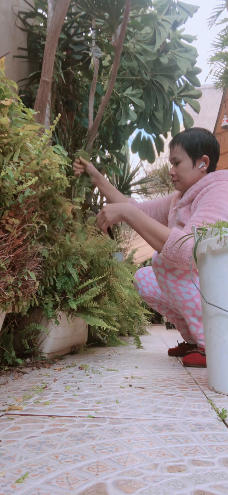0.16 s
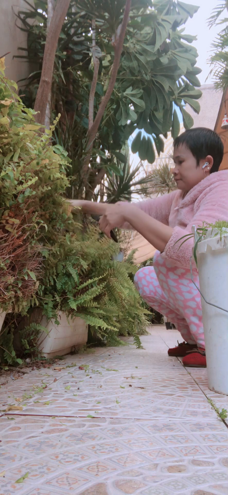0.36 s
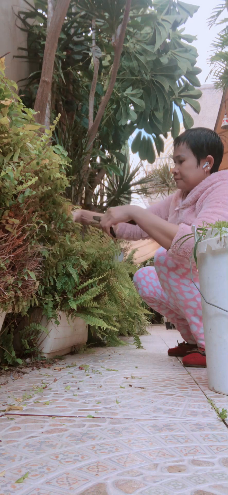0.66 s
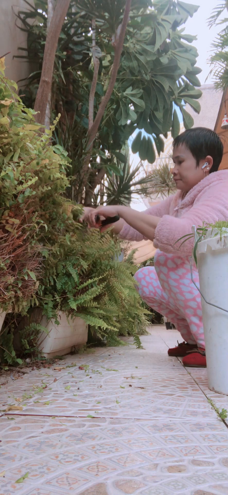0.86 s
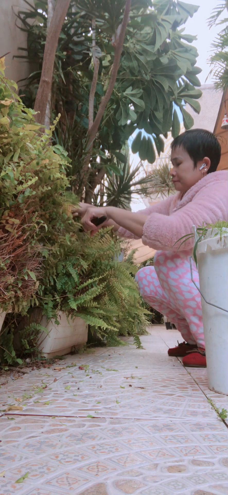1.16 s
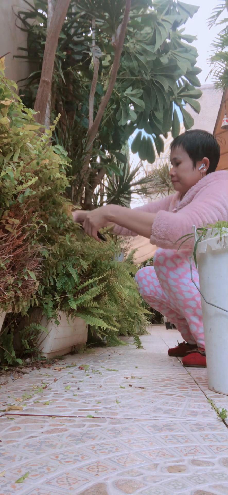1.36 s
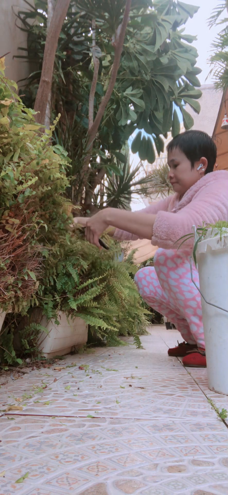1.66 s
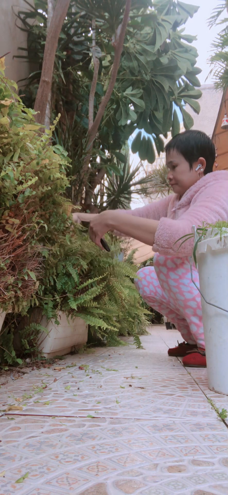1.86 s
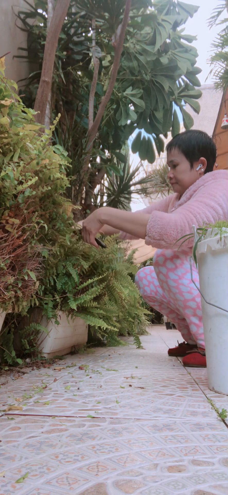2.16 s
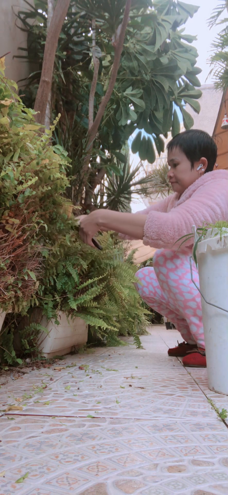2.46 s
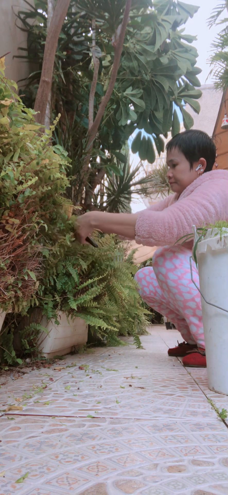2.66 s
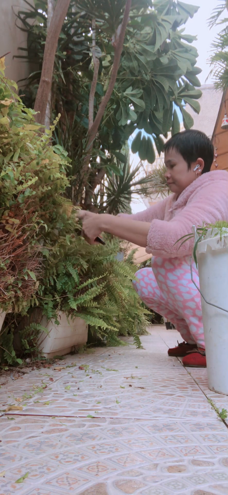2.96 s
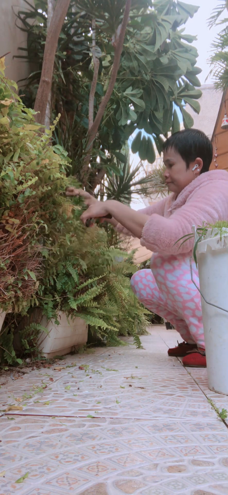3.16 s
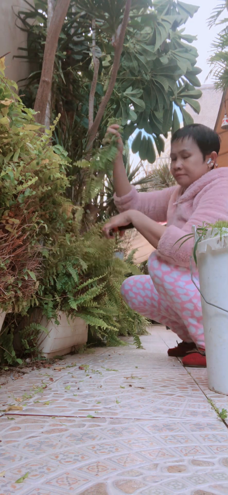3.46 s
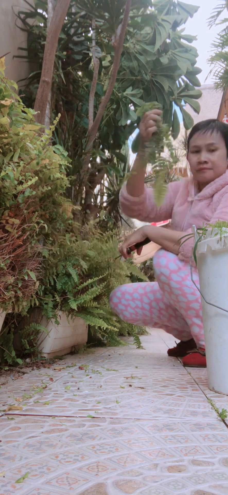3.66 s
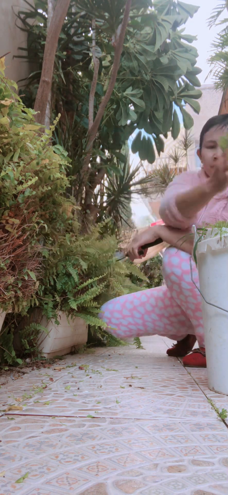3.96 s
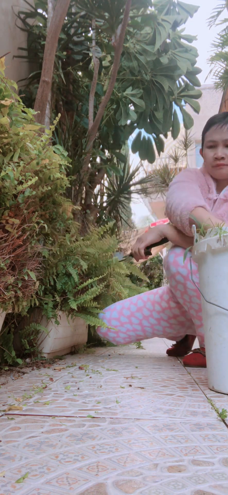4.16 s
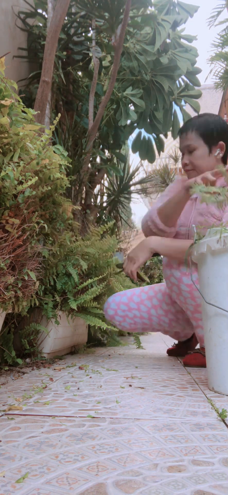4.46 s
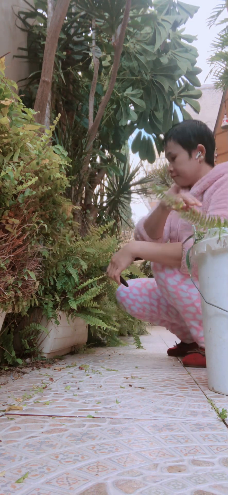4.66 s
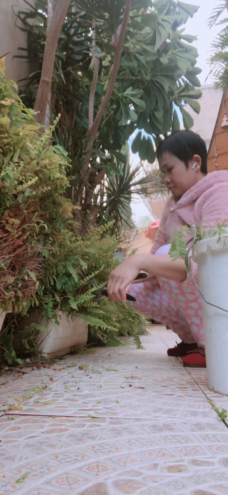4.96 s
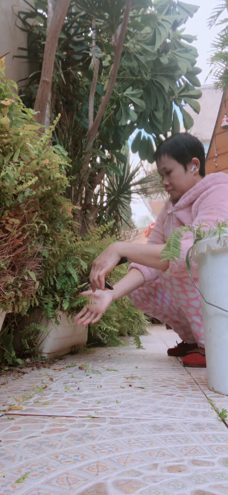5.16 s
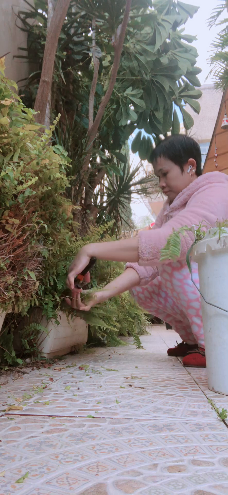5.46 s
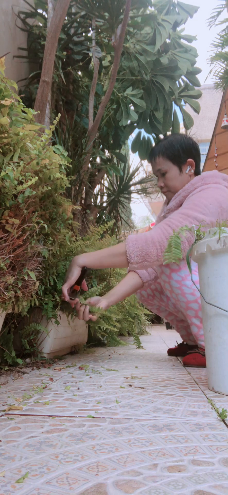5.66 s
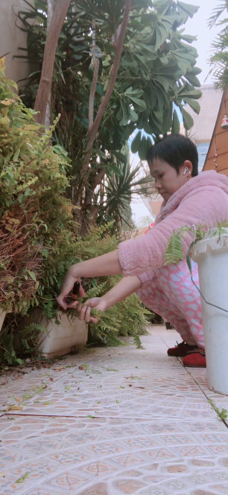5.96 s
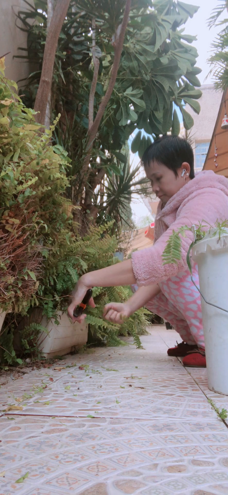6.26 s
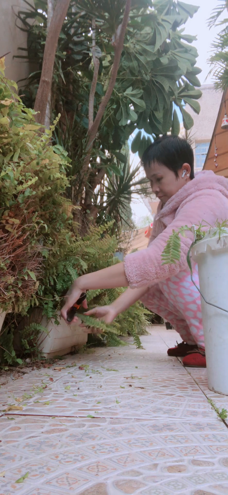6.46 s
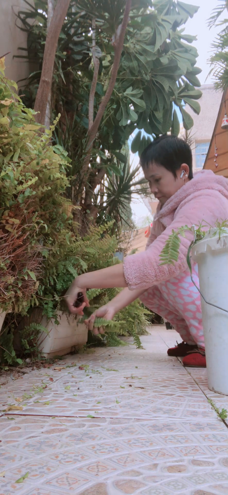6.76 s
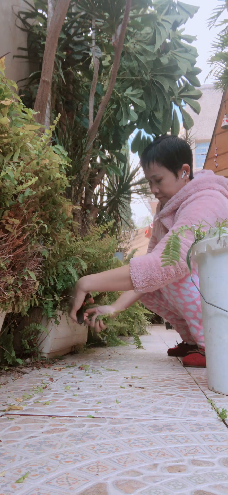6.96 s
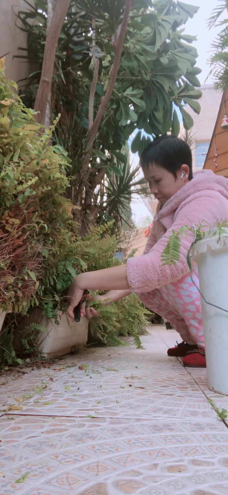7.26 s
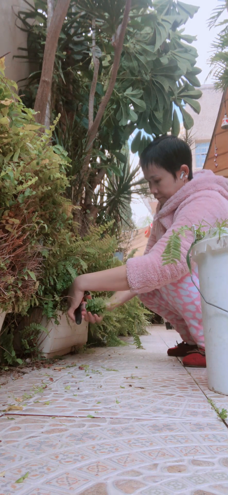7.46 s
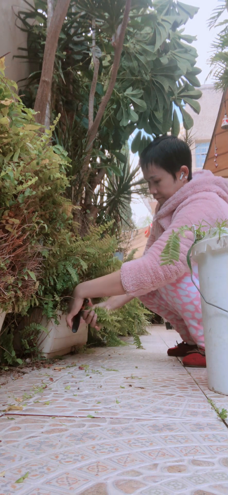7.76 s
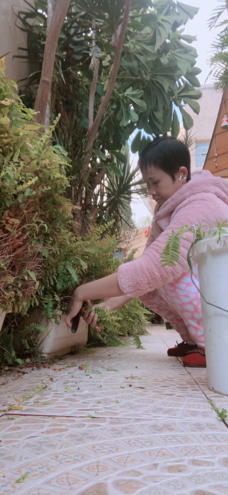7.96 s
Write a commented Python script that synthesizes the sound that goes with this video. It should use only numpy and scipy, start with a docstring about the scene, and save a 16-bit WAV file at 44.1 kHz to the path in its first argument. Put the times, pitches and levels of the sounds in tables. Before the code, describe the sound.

In a walled, tiled garden, small birds chatter in rough double notes over a slow, swelling low hum. Close to the microphone, leaves rustle softly and pruning shears click faintly, their pivot squeaking twice. Near the middle a stalk snaps and cuttings drop with a hollow plastic bucket knock and brief rattle. Then crisp, louder snips and two more high squeaks follow, ending with a small crunchy cut.

```python
"""In a walled garden, pruning shears cut fern stems, and their dry pivot squeaks as the spring reopens them.
Bursts of noise ring the steel for each cut; gliding, trembling sines make the squeaks.
Ticks and noise rustle as leaves, stalks snap, and a plastic bucket rings when a handful of cuttings goes in.
Small birds chatter hoarsely off the walls in rough double notes, over a slowly swelling hum and soft noise."""
import sys
import numpy as np
from scipy import signal
from scipy.fft import rfft, irfft, next_fast_len
from scipy.io import wavfile

SR = 44100
rng = np.random.default_rng(int(sys.argv[2]) if len(sys.argv) > 2 else 0)


def unload_wav(signal):
    """Save mono or channel-first audio to the path in sys.argv[1] as 16-bit WAV at rate SR, clipped to [-1, 1]."""
    wavfile.write(
        sys.argv[1],
        SR,
        np.round(np.clip(np.atleast_2d(signal).T, -1, 1) * 32767).astype(np.int16),
    )


N = 357200
T = np.arange(N) / SR  # time of every sample, in seconds


def from_db(db):
    """Turn decibels into a gain."""
    return 10 ** (np.asarray(db) / 20)


def rms_one(x):
    """Scale a sound to an average (rms) strength of 1."""
    return x / np.sqrt(np.mean(x ** 2) + 1e-20)


def drift(rate):
    """Random wandering of spread 1, in straight lines between about rate random points a second."""
    knots = rng.standard_normal(N // 4)
    return np.interp(T * rate, np.arange(len(knots)), knots) * np.sqrt(3 / 2)


def colour(x, points):
    """Make pitch ranges louder or softer, following a curve through points of Hz and dB."""
    hz, db = np.transpose(points)
    size = next_fast_len(N + SR // 4)
    grid = np.maximum(np.fft.rfftfreq(size, 1 / SR), 1)
    gain = from_db(np.interp(np.log(grid), np.log(hz), db))
    return irfft(rfft(x, size) * gain, size)[:N]


def high_pass(x, hz, order):
    """Take away the bass, as small vibrating things give off little of it."""
    return signal.sosfilt(signal.butter(order, hz, "high", fs=SR, output="sos"), x + 1e-18)


def resonate(x, hz, width):
    """Let one pitch range through, as a vibrating body does, with gain 1 at its peak."""
    r = np.exp(-np.pi * width / SR)
    numerator = np.array([1, 0, -1]) * (1 - r * r) / 2
    denominator = [1, -2 * r * np.cos(2 * np.pi * hz / SR), r * r]
    return signal.lfilter(numerator, denominator, x + 1e-18)


def ring(x, hz, t60):
    """A click of height 1 sets off a sine of height 1 that fades by 60 dB in t60 seconds."""
    r = from_db(-60 / (t60 * SR))
    w = 2 * np.pi * hz / SR
    return signal.lfilter([0, np.sin(w)], [1, -2 * r * np.cos(w), r * r], x + 1e-18)


def add(out, s, sound):
    """Mix a sound in, starting at s seconds."""
    start = max(int(s * SR), 0)
    out[start:start + len(sound)] += sound[:max(N - start, 0)]


def swell(length, edge):
    """Times and loudness curve of a sound that fades in and out over a share (edge) of its length."""
    t = np.arange(int(length * SR)) / SR
    nearest_end = np.minimum(t, length - t)
    return t, np.sin(np.pi / 2 * np.clip(nearest_end / (edge * length), 0, 1))


def crunch(length):
    """Plant fibres give way in a quick, dying burst of noise with energy 1."""
    t = np.arange(SR // 20) / SR
    burst = rng.standard_normal(len(t)) * np.exp(-t / length) * (1 - np.exp(-2 * t / length))
    return burst / np.linalg.norm(burst)


def scrape(length):
    """Friction noise that grows as the blades are pressed home, with energy 1."""
    t = np.arange(int(length * SR)) / SR
    rub = rng.standard_normal(SR // 20)[:len(t)] * t
    return rub / np.linalg.norm(rub)


def garden(x, t60, delay=0.0032):
    """Scattered echoes from tiles, walls and foliage: fading noise with energy 1, begun after a delay in s."""
    t = np.arange(SR) / SR
    tail = rng.standard_normal(SR) * from_db(-60 * t / t60) * (t > delay)
    return signal.fftconvolve(x, tail / np.linalg.norm(tail))[:N]


def background(air_db=-42, waver_db=0.34):
    """A motor hums, strongest at twice the mains rate, over the low noise of the neighbourhood."""
    # Colour of the air noise. Each row: pitch in Hz, level in dB per Hz (relative).
    air_colour = [(22, -15), (48, 8), (75, -3), (140, -7), (230, -7), (350, -14), (780, -18), (1300, -23.5),
                  (1900, -25), (2900, -26.5), (4200, -34.5), (6300, -39), (7700, -52), (11000, -52),
                  (15500, -56)]
    # Slow swelling of the hum. Each row: time in seconds, level in dB rms of the 100 Hz line.
    hum_level = [(0.0, -37), (0.02, -37.5), (1.17, -41.5), (1.62, -36.5), (2.41, -41.5), (3.5, -37),
                 (4.35, -41), (5.48, -36.5), (6.56, -40.5), (7.83, -36.5), (8.1, -37.5)]
    # Steady tones in the hum. Each row: pitch in Hz, level in dB beside the 100 Hz line.
    hum_lines = [(100, 0), (49.9, -19), (226.1, -19.5)]
    hum = np.zeros(N)
    for hz, db in hum_lines:
        strength = from_db(db + waver_db * drift(8)) * np.sqrt(2)
        hum += strength * np.sin(2 * np.pi * hz * T + .15 * drift(4))
    s, db = np.transpose(hum_level)
    air = rms_one(colour(rng.standard_normal(N), air_colour))
    return from_db(np.interp(T, s, db)) * hum + from_db(air_db) * air


def foliage(level_db=3, brush=0.98):
    """Fronds brush past each other with every reach: clumps of tiny ticks over a soft swish."""
    # Reaches into the leaves. Each row: time of the height of the movement in seconds,
    # time to swell and to settle in seconds, rustle in dB before the overall level.
    reaches = [(.35, 0.12, -61), (1.53, 0.13, -57), (2.2, .3, -59), (2.95, 0.23, -55), (3.65, 0.32, -65),
               (3.96, 0.066, -46), (4.22, 0.11, -54.5), (5.45, 0.093, -58.5), (5.9, 0.13, -56.5),
               (6.65, 0.14, -64), (7.33, 0.34, -58.5), (8, 0.24, -56.5)]
    # Colour of the rustle. Each row: pitch in Hz, level in dB per Hz (relative).
    leaf_colour = [(700, -5), (2000, 4.5), (4000, -1.5), (6200, 2), (7500, -8.5), (9500, 0), (12000, -0.5),
                   (14000, -10), (16000, -11)]
    at_rest_db = -67.5  # before the overall level
    per_s, spread_db, clump_db = 1400, 4.5, 5  # tick rate, and how much tick size and tick rate vary
    sizes = from_db(spread_db * np.minimum(rng.exponential(1, N), 4)) * rng.choice([-1, 1], N)
    happens = rng.random(N) < per_s * from_db(clump_db * drift(40)) / SR
    ticks = rms_one(sizes * happens)
    power = from_db(at_rest_db) ** 2
    for s, settle, db in reaches:
        power = power + from_db(db) ** 2 * np.exp(-((T - s) / settle) ** 2)
    rustle = rms_one(colour(ticks + brush * rng.standard_normal(N), leaf_colour))
    return from_db(level_db) * np.sqrt(power) * rustle


def scuffs(relative_width=0.55):
    """Soles, clothing and cuttings rub as the gardener shifts: short, dull puffs of filtered noise."""
    # Scuffs and swishes. Each row: start in seconds, length in seconds, centre pitch in Hz, level in dB rms.
    rubs = [(3.9, 0.28, 1970, -50.5), (3.974, 0.077, 474, -49), (4.062, 0.21, 2240, -52),
            (5.115, 0.103, 483, -49), (5.137, 0.23, 1000, -50.5), (6.419, 0.05, 2640, -57.5),
            (7.944, 0.08, 437, -49)]
    out = np.zeros(N)
    for s, length, hz, db in rubs:
        t, envelope = swell(length, edge=0.43)
        rub = rng.standard_normal(SR)[:len(t)]
        for _ in range(2):
            rub = resonate(rub, hz, hz * relative_width)
        add(out, s, from_db(db) * rms_one(rub * envelope))
    return out


def rasp(flutter_hz=720, glide=.16, hiss_db=-4):
    """Harsh buzz of a bird's throat: fast pulses whose rate glides, with the hiss of rough air."""
    rate = flutter_hz * np.exp(glide * drift(14) + .025 * drift(600))
    pulses = signal.sawtooth(2 * np.pi * np.cumsum(rate) / SR)
    clicks = rms_one(np.diff(pulses, prepend=0))
    return (clicks + from_db(hiss_db) * rng.standard_normal(N)) * from_db(4.9 * drift(250))


def calls():
    """Fill each bout of chirps with evenly spaced calls, the repeats straying in pitch; same columns as a bout."""
    # Bouts of chirps, a short one being a single call. Each row: start in seconds, length in seconds,
    # lower voice in Hz, upper voice in Hz, level in dB before later gains, upper against lower voice in dB.
    bouts = [(.118, 0.087, 2384, 5200, -45.5, -0.5), (0.326, 0.24, 2895, 3650, -47, 0),
             (0.792, 0.12, 2147, 3660, -47, -1.5), (1.053, .21, 2100, 3590, -47, -3),
             (1.469, 0.17, 2200, 3830, -48.5, -3.5), (1.779, 0.35, 2285, 3610, -49, 1),
             (2.251, 0.075, 1890, 3500, -50.5, -0.5), (2.372, .25, 2390, 3660, -48, 0),
             (2.737, .51, 2220, 3650, -49, -0.5), (3.437, 0.089, 2385, 3520, -46, 0.5),
             (3.745, 0.11, 2560, 3860, -43, -1.5), (4.262, 0.19, 2100, 3450, -52, -5.5),
             (4.656, 0.17, 2196, 3550, -46, -3), (4.922, 0.057, 2410, 3650, -48.5, -0.5),
             (5.221, 0.43, 2370, 3580, -50.5, -3.5), (5.945, .2, 2270, 3665, -51, -2),
             (6.572, .11, 2487, 5320, -46.5, -0.5), (6.865, .092, 2460, 4920, -46, -3),
             (7.141, 0.16, 2450, 4500, -44, -3), (7.594, 0.081, 2380, 5570, -46.5, -2),
             (7.989, 0.086, 2320, 5700, -47.5, 0)]
    every_s, gap_s = .14, .045  # rough spacing of calls, and the silence between them
    pitch_scatter = .07  # as a share of the pitch
    for s, span, low_hz, high_hz, db, upper_db in bouts:
        count = max(1, round((span + gap_s) / every_s))
        step = (span + gap_s) / count
        for k in range(count):
            low, high = np.exp(pitch_scatter * rng.standard_normal(2) * (k > 0))
            yield s + k * step, step - gap_s, low_hz * low, high_hz * high, db, upper_db


def birds(rasp_db=4, low_rasp_db=1, direct_db=-7, level_db=-3):
    """Each side of a bird's voice organ sings its own arched, shaky note in a rasp, mostly heard off the walls."""
    # Clear, slightly falling notes among the chatter. Each row: start in seconds, length in seconds,
    # middle pitch in Hz, level in dB before the colour and echoes.
    clear_notes = [(0.394, 0.1, 6420, -55.5), (1.22, 0.164, 1855, -54.5), (1.71, 0.093, 1900, -52),
                   (2.17, 0.077, 1820, -54), (3.065, .07, 3250, -53), (3.21, 0.1, 1833, -59)]
    # Colour of the birds' voices. Each row: pitch in Hz, gain in dB.
    voice_colour = [(1000, -34), (1600, 5), (2000, 4), (2500, 3.5), (3100, 2), (4000, 5.5), (5200, 2),
                    (6400, 2), (7200, -7.5), (10000, -5.5), (16000, -30)]
    hoarse, arch, slide = .03, .12, .09  # pitch shake, rise-and-fall and random slope, as shares of the pitch
    dry, shakes, buzz = np.zeros(N), (drift(700), drift(700)), rasp()
    low_rasp = rms_one(resonate(high_pass(buzz, 1560, order=4), hz=2140, width=1230))
    high_rasp = rms_one(resonate(high_pass(buzz, 4110, order=4), hz=4550, width=1300))
    for s, length, low_hz, high_hz, db, upper_db in calls():
        t, envelope = swell(length, edge=.15)
        bend = arch * (np.sin(np.pi * t / length) - np.pi / 4) + slide * rng.normal() * (t / length - .5)
        voices = ((low_hz, 0, low_rasp, low_rasp_db), (high_hz, upper_db, high_rasp, rasp_db))
        for (hz, voice_db, harsh, harsh_db), shake in zip(voices, shakes):
            pitch = hz * (1 + bend + hoarse * np.interp(s + t, T, shake))
            tone = np.sin(2 * np.pi * np.cumsum(pitch) / SR)
            voice = tone + from_db(harsh_db) * np.resize(harsh[int(s * SR):], len(t))
            add(dry, s, from_db(db + voice_db + level_db) * rms_one(voice * envelope))
    for s, length, hz, db in clear_notes:
        t, envelope = swell(length, edge=0.2)
        pitch = hz * (1 + .014 * np.interp(s + t, T, shakes[0]) - .03 * (t / length - .5))
        tone = np.sin(2 * np.pi * np.cumsum(pitch) / SR)
        add(dry, s, from_db(db) * rms_one(envelope * tone))
    dry = colour(dry, voice_colour)
    return from_db(direct_db) * dry + garden(dry, t60=0.49)


def bucket(crack_db=-9, lowest_hz=120, rattle_db=-34, rattle_s=0.044):
    """The hand bumps the plastic wall, which booms while handle and cuttings rattle; longer contacts are duller."""
    # Knocks on the bucket. Each row: time in seconds, strength in dB (relative), contact time in seconds.
    knocks = [(4.1561, -10, 0.0007), (4.1596, 2.5, 0.00074), (4.1822, -5.5, 0.0024), (4.2112, -16, 0.00046)]
    # Ringing tones of the bucket. Each row: pitch in Hz, level in dB (relative), time to fade by 60 dB in seconds.
    bucket_tones = [(132.7, -32, 0.41), (228.6, -17.5, 0.24), (265, -21, 0.076), (376, -6, 0.0178),
                    (540, -10.5, 0.02), (770, -33.5, 0.33), (922, -20, .05), (1300, -30, 0.029),
                    (1700, -30, 0.084), (1890, -14, 0.024), (2480, -38, .08)]
    force, crack, rattle = np.zeros((3, N))
    for s, db, contact in knocks:
        push = np.hanning(int(contact * SR) + 3)
        add(force, s, from_db(db) * push / push.sum())
        add(crack, s, crunch(.002) * from_db(db + crack_db))
    t = np.arange(SR // 4) / SR
    # cubed noise has rare, strong peaks, like loose things knocking together
    jumble = rng.standard_normal(len(t)) ** 3 * np.exp(-t / rattle_s)
    add(rattle, knocks[0][0], jumble * from_db(rattle_db))
    boom = sum(from_db(db) * ring(force, hz, t60) for hz, db, t60 in bucket_tones)
    dry = high_pass(boom, lowest_hz, order=2)
    dry = dry + resonate(crack, hz=2100, width=2000) + resonate(rattle, hz=1640, width=540)
    return dry + from_db(-19) * garden(dry, t60=.3)


def stalks(upper_db=-9, splinter_db=-4):
    """Stiff stalks crack in the hand: a clean snap and a few splinters, lower and duller than the steel rings."""
    # Cracks of the stalks. Each row: time in seconds, strength in dB before the wood's resonances.
    cracks = [(3.9288, 6.5), (3.93, -4), (3.932, -2), (3.958, -2)]
    force = np.zeros(N)
    for s, db in cracks:
        add(force, s, from_db([db]))  # the snap is a single click
        add(force, s, crunch(0.0011) * from_db(db + splinter_db))
    wood = ((2250, 1440, 0), (5200, 730, upper_db))  # Each row: pitch in Hz, width in Hz, level in dB.
    return sum(from_db(db) * resonate(resonate(force, hz, width), hz, width) for hz, width, db in wood)


def squeaks(octave_db=-21, tail_db=-22):
    """The pivot sticks and slips in a near-pure tone that sinks from its top pitch, in some after a quick climb."""
    # Pivot squeaks, one for each opening. Each row: start in seconds, attack in seconds, hold in seconds,
    # release in seconds, level in dB, pitch rise in seconds, top pitch in Hz, pitch sag in seconds, end pitch in Hz.
    openings = [(1.161, 0.0026, 0.0069, 0.11, -26.5, 0, 8430, 0.047, 7340),
                (2.839, 0.023, .008, 0.017, -20.5, 0, 8040, 0.014, 6670),
                (6.042, .012, 0.045, 0.016, -21.5, 0.0044, 7750, 0.018, 6360),
                (6.731, 0.0067, 0.0081, 0.076, -17, 0.013, 7270, 0.029, 6560)]
    climb_hz_per_s = 110000  # as the spring takes hold
    edge_db = -27  # start and stop of each tone, beside its level
    jitter, waver, flutter_db, echo_db = .003, .004, 1.6, -18  # jitter and waver are shares of the pitch
    dry = np.zeros(N)
    wobble = 1 + jitter * drift(900) + waver * drift(150)
    grip = from_db(flutter_db * drift(350))
    for s, attack, hold, release, db, rise, top_hz, sag, end_hz in openings:
        corners = s + np.cumsum([0, attack, hold, release])
        on = (T >= s) & (T <= corners[-1])
        t = T[on] - s - rise  # zero at the top pitch
        climbing = top_hz + climb_hz_per_s * t
        sinking = end_hz + (top_hz - end_hz) * np.exp(-(t / sag) ** 2)
        hz = np.where(t < 0, climbing, sinking)
        phase = 2 * np.pi * np.cumsum(hz * wobble[on]) / SR
        envelope = from_db(db + np.interp(T[on], corners, [edge_db, 0, 0, edge_db]))
        dry[on] += envelope * grip[on] * (np.sin(phase) + from_db(octave_db) * np.sin(2 * phase))
    return dry + from_db(echo_db) * garden(dry, t60=0.13) + from_db(tail_db) * garden(dry, t60=.35)


def snips(level_db=17, early_db=-11, tail_db=-18, lowest_hz=2000, squeeze_db=-21, handle_db=-17):
    """The stem creaks under the blade, then gives way and shakes the steel and the handle."""
    # Blades biting stems and closing. Each row: time in seconds, strength in dB before the overall level,
    # extra treble in dB, crunch length in seconds.
    bites = [(.9485, -33, 2, 0.0011), (2.067, -34, 5, 0.00076), (2.593, -32.5, 6.5, .0016),
             (5.8476, -7.5, -3, 0.0011), (5.8714, -18.5, 3, 0.003), (5.8985, -7.5, -5, 0.0015),
             (5.9048, -13, 1, 0.00077), (6.0245, -33, -15, 0.00055), (6.4425, -41, 8, 0.00056),
             (6.5215, -36, -10, .0014), (6.5484, -9.5, -3, 0.0017), (7.925, -39, 11, 0.0009),
             (7.9518, -18, 2.5, 0.0014), (7.976, -23, 0, 0.0081), (7.983, -22, -10, 0.0017)]
    # Resonances of the shears. Each row: pitch in Hz, width in Hz, level in dB.
    shears = [(2900, 670, 3), (4550, 1560, -5.5), (5600, 380, -0.5), (9240, 1500, -5), (11200, 1500, -13),
              (13500, 1300, -25)]
    body, treble = np.zeros((2, N))
    squeeze_s = .004
    for s, db, treble_db, length in bites:
        creak = scrape(squeeze_s) * from_db(squeeze_db)
        for start, burst in ((s - squeeze_s, creak), (s, crunch(length))):
            add(body, start, burst * from_db(db + level_db))
            add(treble, start, burst * from_db(db + level_db + treble_db))
    steel = np.zeros(N)
    for hz, width, db in shears:
        source = treble if hz > 8000 else body
        steel += from_db(db) * resonate(source, hz, width)
    handle = resonate(resonate(body, 950, 500), 950, 500)
    dry = high_pass(steel, lowest_hz, order=4) + from_db(handle_db) * handle
    return dry + from_db(early_db) * garden(dry, t60=0.052) + from_db(tail_db) * garden(dry, t60=0.28)


def scene():
    """Add all the sources together on one channel."""
    return (snips() + squeaks() + stalks() + bucket() + birds() + foliage() + scuffs() + background())[None]


def record(dry):
    """The microphone dulls the highest treble, and everything above 16 kHz is cut steeply."""
    dull = signal.sosfilt(signal.butter(4, 14800, fs=SR, output="sos"), dry)
    return signal.sosfilt(signal.ellip(10, .1, 90, 16000, fs=SR, output="sos"), dull)


dry = scene()
out = record(dry)
unload_wav(out)
```